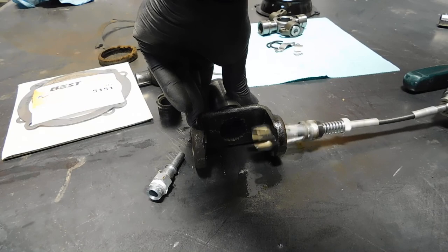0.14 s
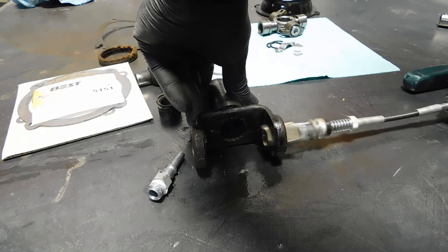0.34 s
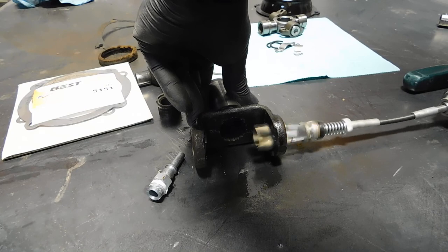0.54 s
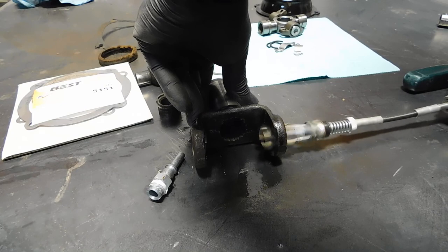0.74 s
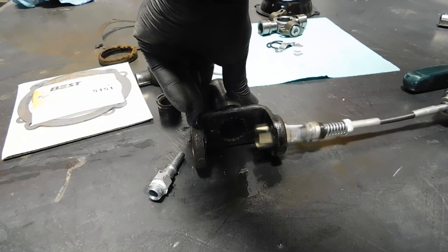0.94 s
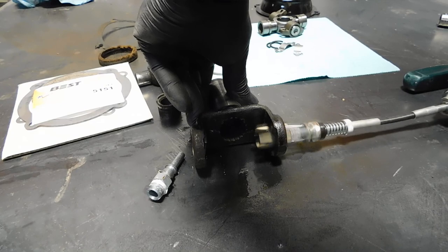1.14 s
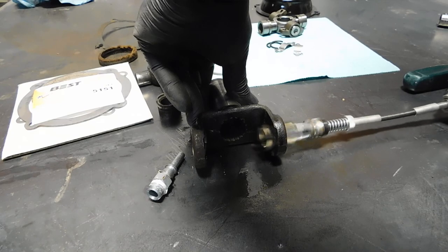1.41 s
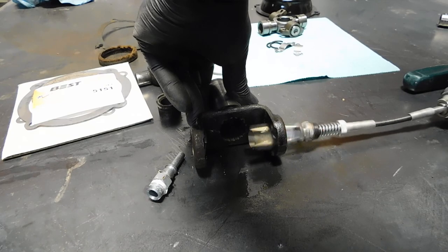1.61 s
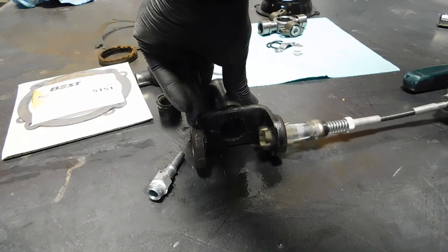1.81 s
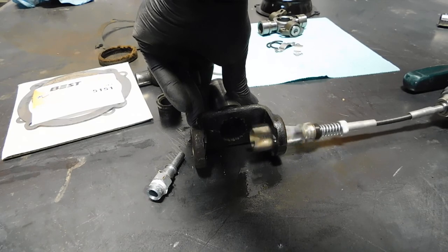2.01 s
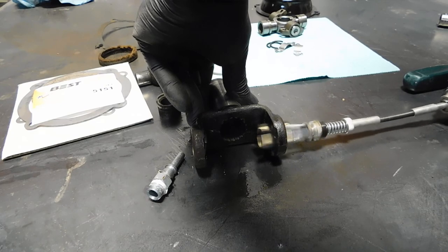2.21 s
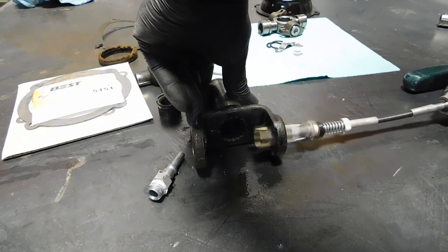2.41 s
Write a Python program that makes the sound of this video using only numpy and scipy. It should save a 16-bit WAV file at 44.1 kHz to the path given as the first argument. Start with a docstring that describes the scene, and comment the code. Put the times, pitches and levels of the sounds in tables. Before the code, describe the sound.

An electric drill is already running, its piercing whine near 3.8 kHz over a bright fan and gear rush. Gritty, fluttering scrapes with a metallic sizzle swell about every 0.4 seconds, seven in all, over uneven low bench rumble. At about 1.05 seconds the whine steps up slightly, holds, then from 2.2 seconds slides down and fades while rush continues. Small dry clacks scatter throughout, clustering near 2.4. Close stereo, leaning right.

```python
"""Drill-driven hone in a steel bore

An electric drill, off to the right, spins a three-stone hone inside a steel bore held on a workshop bench.
The motor, sines and ringing noise over a coloured rush, speeds up once and winds down. On each hand stroke
the stones grind harder: random grit catches gate noise that scrapes, sizzles and rings the bore modes.
The same catches gate the low bench rumble; short noise bumps clack as a stone catches."""
import sys
import numpy as np
from scipy import signal
from scipy.fft import rfft, irfft
from scipy.io import wavfile

SR = 44100
rng = np.random.default_rng(int(sys.argv[2]) if len(sys.argv) > 2 else 0)


def unload_wav(signal):
    """Save mono or channel-first audio to the path in sys.argv[1] as 16-bit WAV at rate SR, clipped to [-1, 1]."""
    wavfile.write(
        sys.argv[1],
        SR,
        np.round(np.clip(np.atleast_2d(signal).T, -1, 1) * 32767).astype(np.int16),
    )


N = 112454

# Bench rumble spectrum: (frequency [Hz], relative density [dB per Hz])
BENCH_SPECTRUM = [(20, -2), (80, -1.5), (200, 0.5), (350, 0), (700, 3.5), (1100, -3.5), (1600, -22)]
# Bench rumble before BENCH_GAIN_DB: (time [s], level [dB])
RUMBLE_LEVEL = [(0.0, -53), (0.09, -45), (0.11, -41), (0.23, -38), (0.42, -58), (0.54, -34), (0.72, -44),
                (0.77, -62), (0.88, -36.5), (0.98, -36.5), (1.12, -44), (1.21, -37.5), (1.38, -37),
                (1.43, -45.5), (1.8, -36), (1.87, -44), (2.06, -37), (2.25, -48), (2.27, -41),
                (2.43, -37.5), (2.46, -52), (2.55, -44)]
BENCH_GAIN_DB, BENCH_LUMPS_DB, BENCH_JOLT_S = 2, 1, 0.013

# Rush of fan and gears: (frequency [Hz], relative density [dB per Hz])
RUSH_SPECTRUM = [(30, -28), (150, -30), (250, -11.5), (400, -16), (700, -13), (1000, -7.5), (1300, -5),
                 (1550, -5.5), (1900, 0), (2250, -2.5), (2700, -2), (3300, -2.5), (3900, -6), (4200, -8),
                 (4700, -4), (5600, -9), (7500, -11.5), (10500, -13.5), (13000, -11), (14500, -15),
                 (15600, -19)]
RUSH_DB, RUSH_PATCHY_DB = -21.5, 0.52

# Motor whine, before wobble: (time [s], frequency [Hz])
WHINE_PITCH = [(0, 3781), (.2, 3777), (.38, 3786), (.8, 3791), (1.02, 3786), (1.08, 3880), (1.13, 3945),
               (1.19, 3989), (1.38, 4009), (1.46, 4018), (2.21, 4018), (2.24, 3982), (2.28, 3882),
               (2.38, 3663), (2.55, 3290)]
# Motor whine, before waver: (time [s], rms level [dB])
WHINE_LEVEL = [(0, -23.5), (.5, -23), (1.0, -23.5), (1.055, -23), (1.08, -18.5), (1.105, -27), (1.2, -22.5),
               (1.6, -21.5), (1.7, -22.5), (2.2, -22.5), (2.25, -27), (2.3, -22), (2.385, -22), (2.4, -31),
               (2.44, -40), (2.55, -56)]
# Other shaft and gear tones: (multiple of shaft speed [-])
TONE_MULTIPLES = [1, 4.615, 5, 6, 6.923, 10, 11.25, 13, 20, 23]
# Peak levels of those tones, before waver: (at part speed [dB], at full speed [dB])
TONE_LEVELS = [(-52, -60), (-48, -41.5), (-40, -60), (-60, -45), (-50, -39), (-33.5, -50), (-39, -31),
               (-43, -34), (-60, -46), (-60, -48)]
# Housing resonances: (frequency [Hz])
HOUSING_MODES_HZ = [820, 1100, 1870, 1990, 2350, 2610, 2745, 3012, 3279, 4600, 5087, 6120]
# Their rings, before waver: (width [Hz], rms at part speed [dB], rms at full speed [dB])
HOUSING_RINGS = [(30, -48, -46), (30, -50, -46), (40, -38, -40), (30, -44, -41), (25, -44, -42),
                 (40, -41, -41), (20, -46, -42), (20, -42, -42), (20, -52, -43), (60, -46, -40),
                 (50, -38, -39), (80, -46, -45)]
WHINE_MULTIPLE = 15  # whine cycles per shaft turn
PART_SPEED_HZ, FULL_SPEED_HZ = 3790, 4010  # as whine frequency
WHINE_WOBBLE_HZ = 2.5
WHINE_WAVER_DB, TONE_WAVER_DB, HOUSING_WAVER_DB = 1.7, 2.5, 3.0
LET_GO_S, LET_GO_DB_PER_S = 2.22, 80

# Hand strokes: (start [s], hold [s], relative level [dB])
STROKES = [(0.076, 0.078, -28.5), (0.474, 0.072, -26.5), (0.825, 0.092, -28.5), (1.18, 0.14, -25.5),
           (1.569, 0.16, -29), (1.943, 0.14, -28.5), (2.27, 0.11, -32.5)]
ATTACK_S, RELEASE_S, IDLE_DB = 0.057, 0.13, -36.5
# Stone catching, before CLACK_GAIN_DB: (time [s], relative peak [dB])
CLACKS = [(0.024, -12.5), (0.1072, -17), (0.1457, -11), (0.179, -9), (0.243, -16), (0.559, -11),
          (0.9014, -26), (0.919, -20), (0.936, -15), (0.972, -20), (0.987, -12), (1.2695, -15),
          (1.317, -16), (1.677, -19), (1.705, -21), (2, -23), (2.0472, -22), (2.064, -14), (2.1433, -10),
          (2.2845, -13), (2.3094, -16), (2.3383, -11), (2.3624, -26), (2.39, -8), (2.4084, -9),
          (2.4234, -20), (2.4453, -18), (2.448, -6.5), (2.5002, -11)]
CLACK_GAIN_DB, CLACK_S = -11, 0.0045
SHAFT_TURNS_PER_STONE, STONE_DEPTH, STONE_START_CYCLES = 4.348, 0.8, -0.089
CHATTER_PER_TURN, CHATTER_DEPTH = 0.93, 0.39
JITTER_CYCLES = 0.05  # of stone passing and of chatter
GRITS_PER_S, GRIT_SPREAD_DB, GRIT_S = 1300, 1, 0.00063
RUB_SHARE = 1  # steady rub relative to scratches of rms 1

# Bore modes: (frequency [Hz])
BORE_MODES_HZ = [5070, 6050, 6900, 7900, 8900, 9500, 10250, 12600, 13700]
# Their rings: (relative level [dB], t60 [s])
BORE_RINGS = [(-11.5, 0.011), (0, 0.051), (8, 0.0035), (1.5, 0.035), (5, 0.0051), (4, 0.0061),
              (15.5, 0.0026), (-4, 0.0034), (10, 0.0033)]
# Broad scrape of the stones: (frequency [Hz], relative density [dB per Hz])
SCRAPE_SPECTRUM = [(1000, -16), (3000, -9), (5000, -6.5), (7000, -11.5), (9000, -3.5), (11000, -3.5),
                   (13000, -10), (15600, -7.5)]
# Sizzle, highest part of the scrape: (frequency [Hz], relative density [dB per Hz])
SIZZLE_SPECTRUM = [(6000, -10.5), (9000, -25), (11500, -10), (14000, 4.5), (15700, -6)]
RING_DB, SIZZLE_DB, MODE_WAVER_DB = -6.5, -6, 3.0  # ring and sizzle relative to scrape

# Port phase: (frequency [Hz], left lead [rad])
LEFT_LEAD = [(0, 0), (2300, -2.0), (4000, -2.4), (4400, -3.1), (5500, -4.3), (6000, -6.0), (7800, -6.2),
             (9500, -7.6), (12000, -8.6), (14200, -8.3), (15600, -9.3)]
# Port balance: (frequency [Hz], left minus right [dB])
LEFT_MINUS_RIGHT = [(30, -11), (120, -9.5), (220, -5), (350, -4.5), (550, -2), (1200, -1.5), (1800, -2.8),
                    (2700, -4.6), (4000, -3.6), (4400, -1.5), (5600, -3), (6500, -1), (7300, -3.5),
                    (7900, 0), (9500, -3), (11000, -2), (13000, -5), (15000, -4.5)]
# Direct sound: (frequency [Hz], power share [0..1])
DIRECT_SHARE = [(60, .1), (300, .35), (1000, .7), (1600, .5), (1900, .55), (2350, .25), (2750, .45),
                (3500, .5), (5500, .22), (8000, .5), (13000, .55), (15000, .4)]
CUTOFF_HZ = 15910


def from_db(db):
    """Amplitude ratio of a level in dB."""
    return 10 ** (np.asarray(db) / 20)


def rms_one(x):
    """Scales to rms 1."""
    return x / np.sqrt(np.mean(x ** 2) + 1e-20)


def at_hz(points, hz):
    """Reads a spectrum table along log frequency."""
    table_hz, values = np.transpose(points)
    return np.interp(np.log(hz + 1), np.log(table_hz + 1), values)


def in_time(rows):
    """Reads a time table at every sample."""
    return np.interp(np.arange(N) / SR, *np.transpose(rows))


def coloured(x, spectrum):
    """Shapes a sound by a spectrum table; rms 1."""
    hz = np.arange(N // 2 + 1) * SR / N
    return rms_one(irfft(rfft(x) * from_db(at_hz(spectrum, hz)), N))


def drift(rate_hz):
    """Slow chance of rms 1: noise through two equal poles, run at every 40th sample."""
    r = np.exp(-2 * np.pi * rate_hz * 40 / SR)
    slow = signal.lfilter([1], [1, -2 * r, r * r], rng.standard_normal(N // 40 + 2002))
    slow = slow[2000:]  # drop the filter's start-up
    return np.interp(np.arange(N) / 40, np.arange(len(slow)), rms_one(slow))


def ring(force, hz, t60_s):
    """Damped resonance: a unit click starts a decaying sine of height 1."""
    r = from_db(-60 / (t60_s * SR))
    w = 2 * np.pi * hz / SR
    return signal.lfilter([0, np.sin(w)], [1, -2 * r * np.cos(w), r * r], force + 1e-18)


def smeared(x, seconds):
    """Each click becomes a smooth bump of about that length and height."""
    t = np.arange(-1000, 1001) / SR
    return signal.fftconvolve(x, np.exp(-(2 * t / seconds) ** 2), "same")


def paths():
    """Noise for the direct path and for what each microphone port hears alone from the shop."""
    return rng.standard_normal((3, N))


def bench(grit):
    """Grit catches jolt the bench: low lumpy noise at the rumble level."""
    lumps = rms_one(smeared(grit, BENCH_JOLT_S) * from_db(BENCH_LUMPS_DB * drift(41)))
    level = from_db(in_time(RUMBLE_LEVEL) + BENCH_GAIN_DB)
    return level * coloured(lumps * paths(), BENCH_SPECTRUM)


def motor_rush():
    """Fan and gear rush: coloured noise of slightly patchy level."""
    return from_db(RUSH_DB + RUSH_PATCHY_DB * drift(6.6)) * coloured(paths(), RUSH_SPECTRUM)


def motor_tones(whine_hz):
    """Shaft-locked sines and noise-driven housing rings, whose levels shift with top speed so far."""
    top_hz = np.maximum.accumulate(whine_hz)
    full = np.clip((top_hz - PART_SPEED_HZ) / (FULL_SPEED_HZ - PART_SPEED_HZ), 0, 1)
    shaft_rad = 2 * np.pi * np.cumsum(whine_hz) / SR / WHINE_MULTIPLE
    whine_gain = np.sqrt(2) * from_db(in_time(WHINE_LEVEL) + WHINE_WAVER_DB * drift(33))
    out = whine_gain * np.sin(WHINE_MULTIPLE * shaft_rad)

    fading_db = LET_GO_DB_PER_S * np.maximum(np.arange(N) / SR - LET_GO_S, 0)
    for multiple, (part_db, full_db) in zip(TONE_MULTIPLES, TONE_LEVELS):
        level_db = part_db + (full_db - part_db) * full - fading_db + TONE_WAVER_DB * drift(4.0)
        out += from_db(level_db) * np.sin(multiple * shaft_rad + multiple)

    for hz, (width_hz, part_db, full_db) in zip(HOUSING_MODES_HZ, HOUSING_RINGS):
        level_db = part_db + (full_db - part_db) * full + HOUSING_WAVER_DB * drift(8.6)
        t60_s = np.log(1000) / np.pi / width_hz
        out += from_db(level_db) * rms_one(ring(rng.standard_normal(N), hz, t60_s))
    return out


def pressure():
    """Gain of the stones on the wall: attack, hold, release per stroke, over an idle rub."""
    t = np.arange(N) / SR
    push = np.full(N, from_db(IDLE_DB))
    for start_s, hold_s, db in STROKES:
        corners_s = np.cumsum([start_s, ATTACK_S, hold_s, RELEASE_S])
        angle = np.interp(t, corners_s, [0, np.pi / 2, np.pi / 2, 0])
        push += from_db(db) * np.sin(angle) ** 2
    return push


def catches(whine_hz):
    """Grit catches: random clicks of uneven size that bunch at each passing stone and chatter cycle."""
    turns = np.cumsum(whine_hz) / SR / WHINE_MULTIPLE
    stone_cycles = turns / SHAFT_TURNS_PER_STONE + STONE_START_CYCLES + JITTER_CYCLES * drift(8.8)
    chatter_cycles = turns * CHATTER_PER_TURN + JITTER_CYCLES * drift(12)
    stone = 1 + STONE_DEPTH * np.sin(2 * np.pi * stone_cycles)
    chatter = 1 + CHATTER_DEPTH * np.sin(2 * np.pi * chatter_cycles)
    sizes = from_db(GRIT_SPREAD_DB * np.minimum(rng.exponential(1, N), 3))
    return stone * chatter * sizes * (rng.random(N) < GRITS_PER_S / SR)


def scratching(grit, push):
    """Steady rub and short scratches under the push, plus the clacks, as gated noise."""
    clacks = np.zeros(N)
    for start_s, db in CLACKS:
        clacks[int((start_s + CLACK_S / 2) * SR)] = from_db(db + CLACK_GAIN_DB)
    scratches = rms_one(smeared(grit, GRIT_S))
    force = push * rms_one(RUB_SHARE + scratches) + smeared(clacks, CLACK_S)
    return force * paths()


def hone(grit, sizzle_grit, push):
    """The stones scrape, sizzle and ring the bore, each mode driven with a drifting strength."""
    rub = scratching(grit, push)
    rings = np.zeros((3, N))
    for hz, (db, t60_s) in zip(BORE_MODES_HZ, BORE_RINGS):
        rings += from_db(db) * ring(rub * from_db(MODE_WAVER_DB * drift(28)), hz, t60_s)
    scrape = coloured(rub, SCRAPE_SPECTRUM)
    sizzle = coloured(scratching(sizzle_grit, push), SIZZLE_SPECTRUM)
    return np.std(rub) * (scrape + from_db(RING_DB) * rms_one(rings) + from_db(SIZZLE_DB) * sizzle)


def microphones(sound, tones):
    """Direct sound leads in phase and is mostly louder at the right port; each adds its own shop sound."""
    hz = np.arange(N // 2 + 1) * SR / N
    share = np.clip(at_hz(DIRECT_SHARE, hz), 0, 1)
    side = np.array([[.5], [-.5]])  # left, right
    lead = np.exp(1j * side * np.interp(hz, *np.transpose(LEFT_LEAD)))
    direct, *shop = rfft(sound)
    heard = (np.sqrt(share) * direct + rfft(tones)) * lead + np.sqrt(1 - share) * np.array(shop)
    return irfft(heard * from_db(side * at_hz(LEFT_MINUS_RIGHT, hz)), N)


def scene():
    """Bench, motor and hone share one shaft speed and reach the microphone pair."""
    whine_hz = in_time(WHINE_PITCH) + WHINE_WOBBLE_HZ * drift(17)
    grit = catches(whine_hz)
    sizzle_grit = catches(whine_hz)  # same statistics, moments of its own
    noises = bench(grit) + motor_rush() + hone(grit, sizzle_grit, pressure())
    return microphones(noises, motor_tones(whine_hz))


def record(dry):
    """Steep low-pass cuts the top."""
    return signal.sosfilt(signal.cheby2(30, 60, CUTOFF_HZ, fs=SR, output="sos"), dry)


dry = scene()
out = record(dry)
unload_wav(out)
```